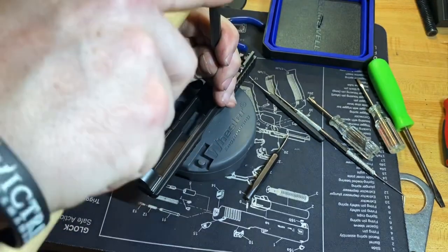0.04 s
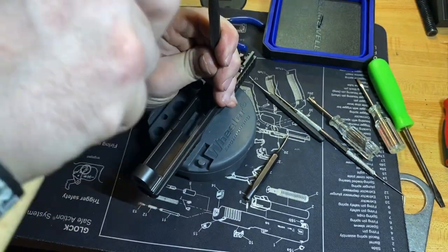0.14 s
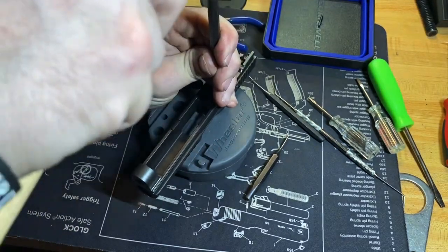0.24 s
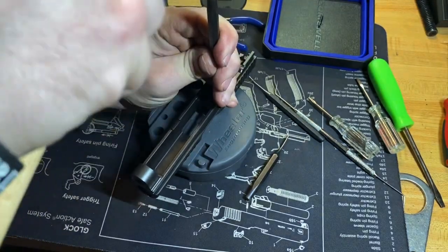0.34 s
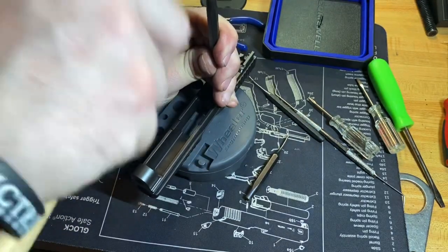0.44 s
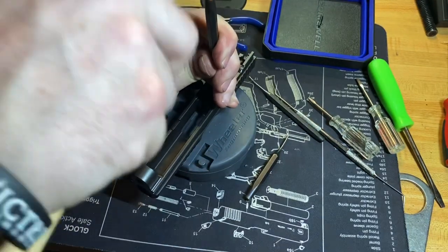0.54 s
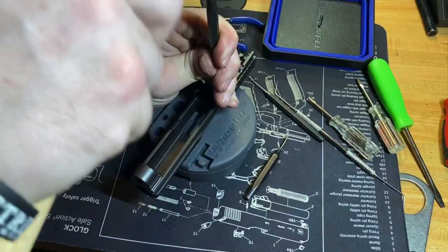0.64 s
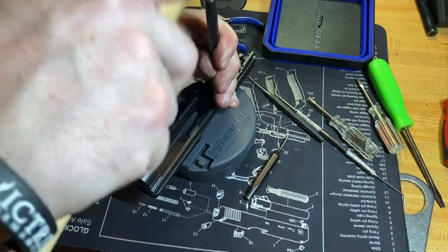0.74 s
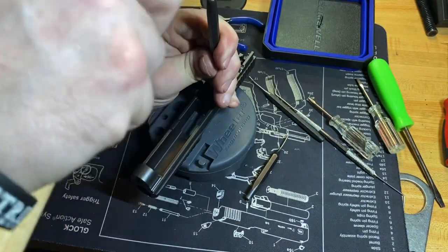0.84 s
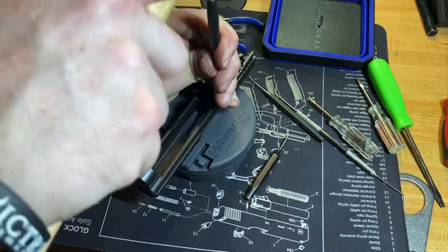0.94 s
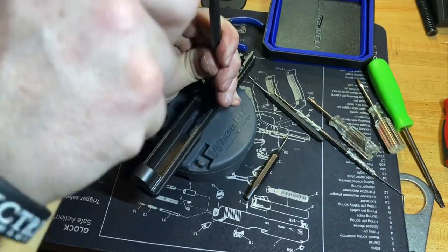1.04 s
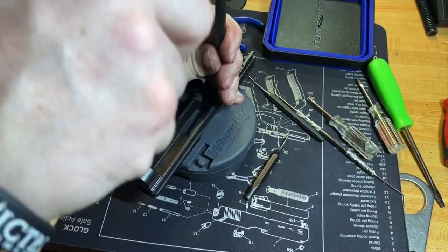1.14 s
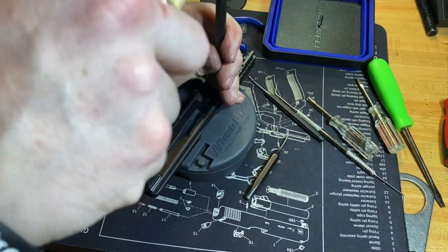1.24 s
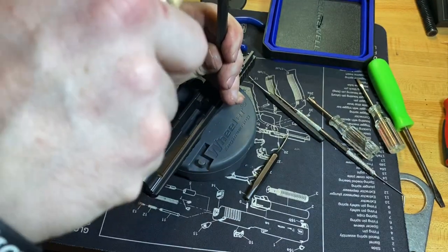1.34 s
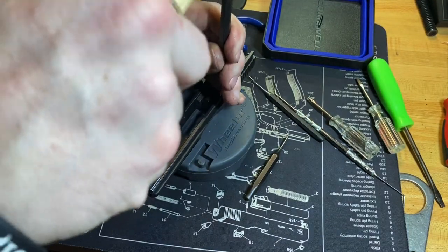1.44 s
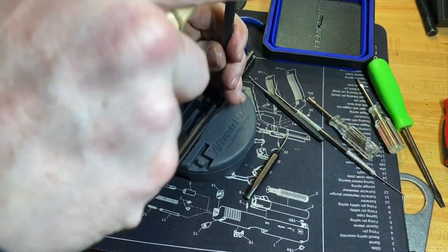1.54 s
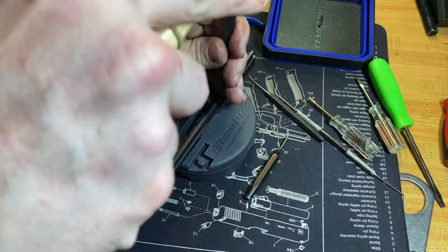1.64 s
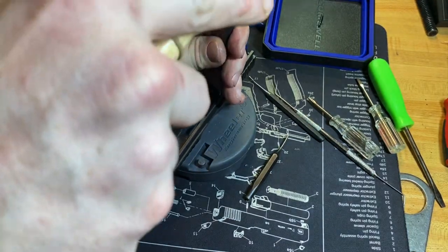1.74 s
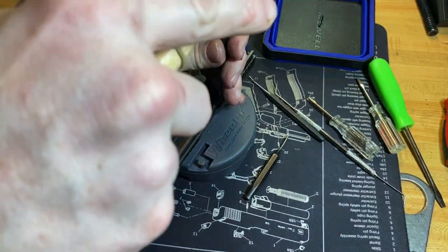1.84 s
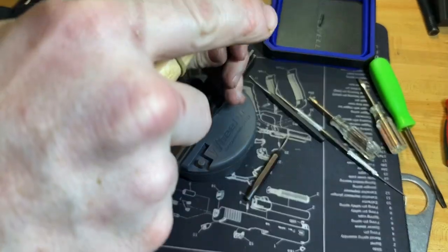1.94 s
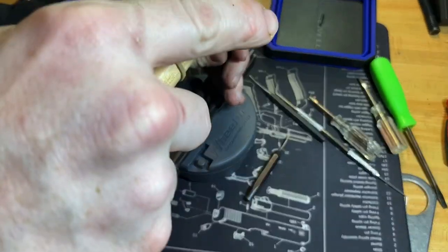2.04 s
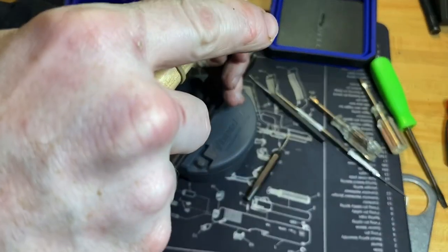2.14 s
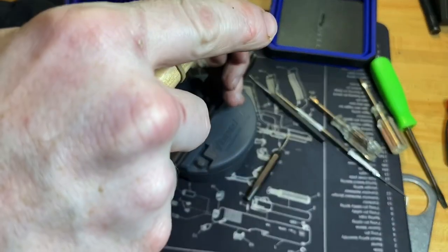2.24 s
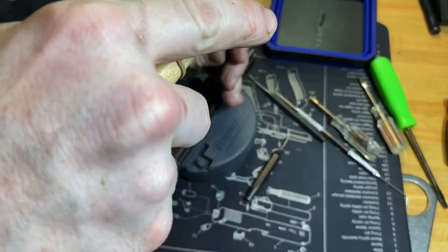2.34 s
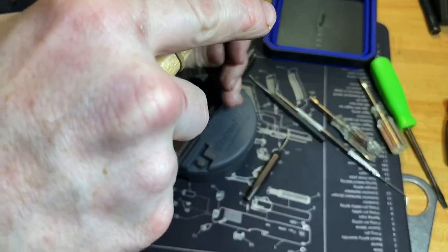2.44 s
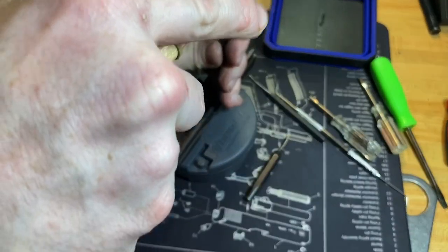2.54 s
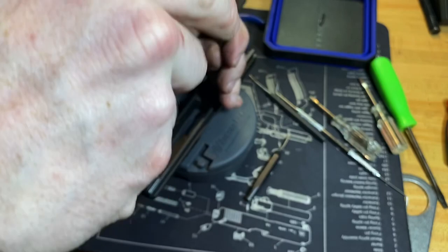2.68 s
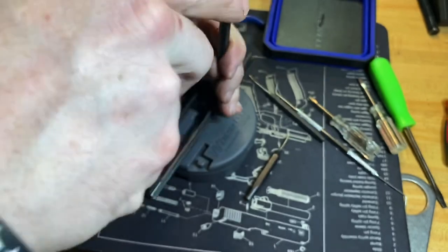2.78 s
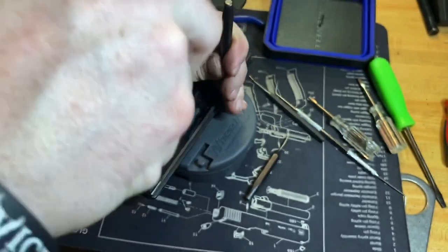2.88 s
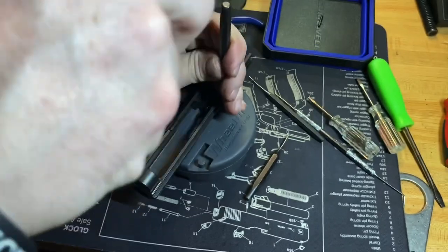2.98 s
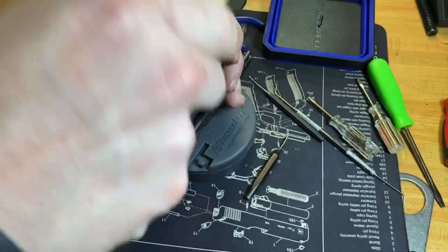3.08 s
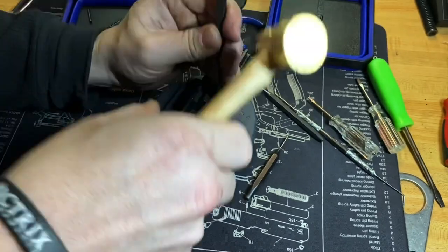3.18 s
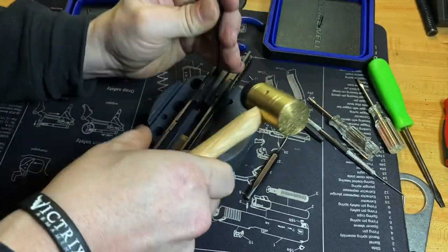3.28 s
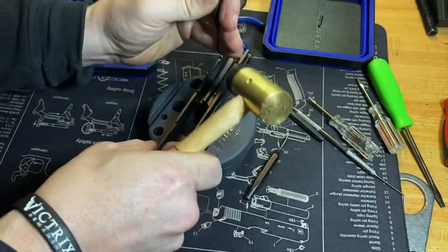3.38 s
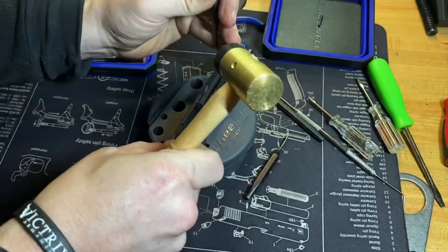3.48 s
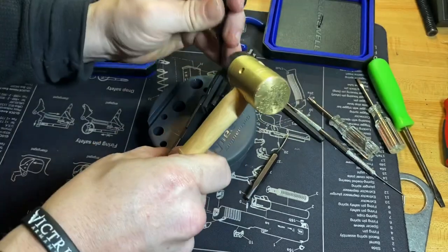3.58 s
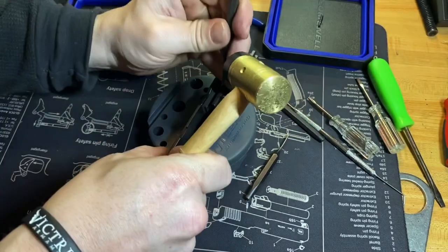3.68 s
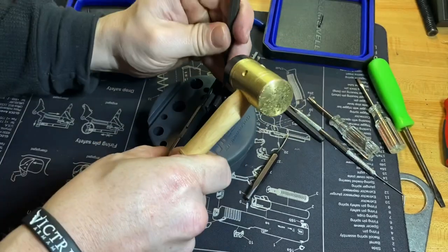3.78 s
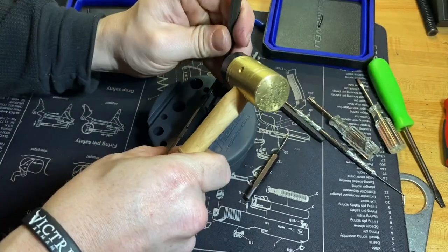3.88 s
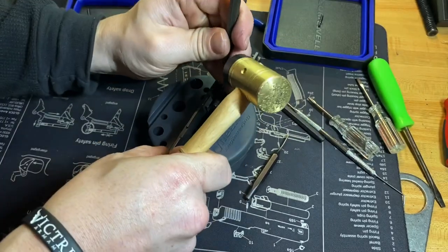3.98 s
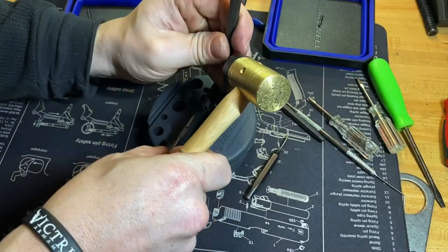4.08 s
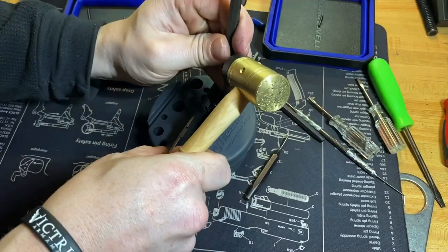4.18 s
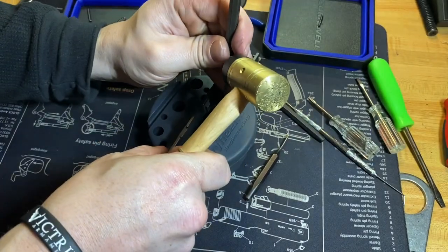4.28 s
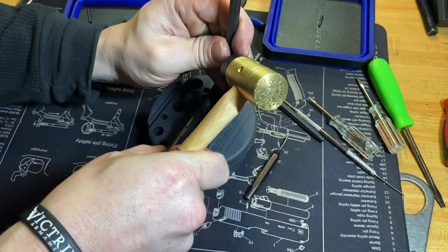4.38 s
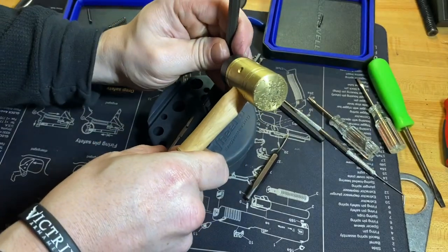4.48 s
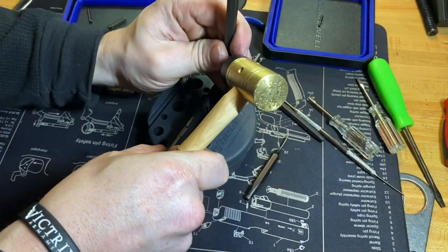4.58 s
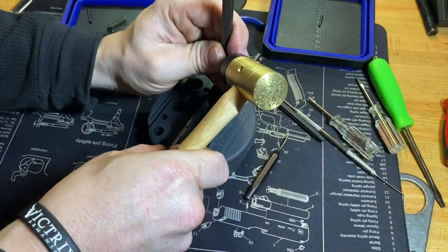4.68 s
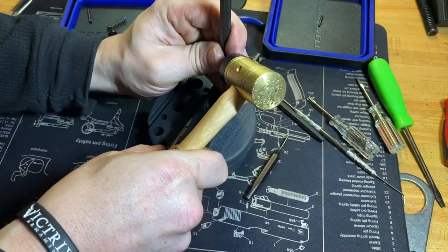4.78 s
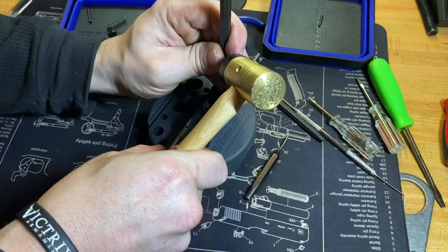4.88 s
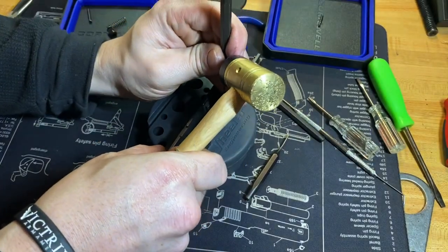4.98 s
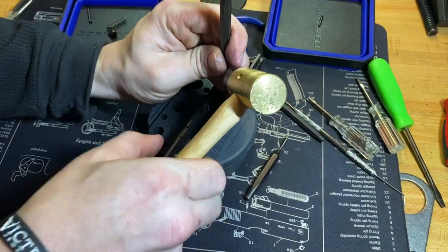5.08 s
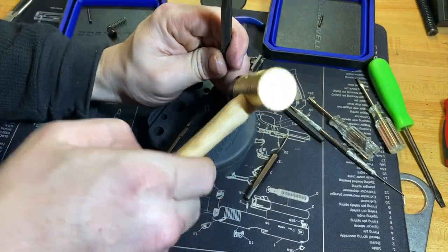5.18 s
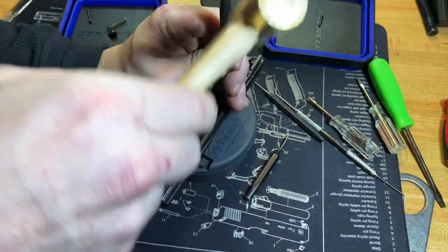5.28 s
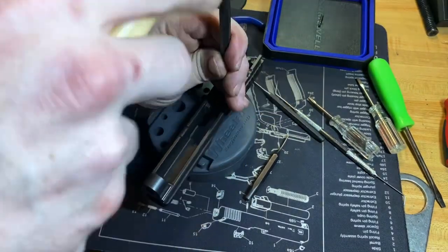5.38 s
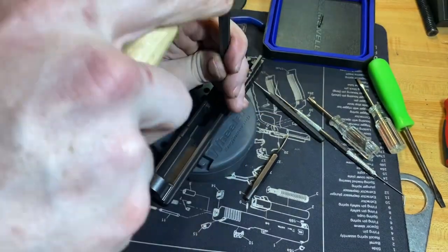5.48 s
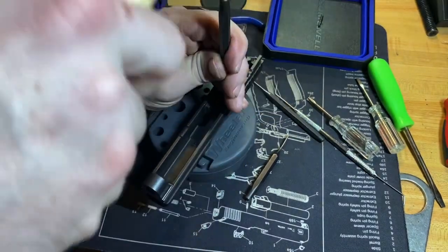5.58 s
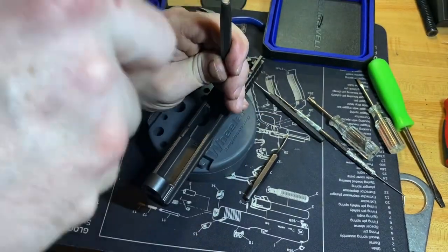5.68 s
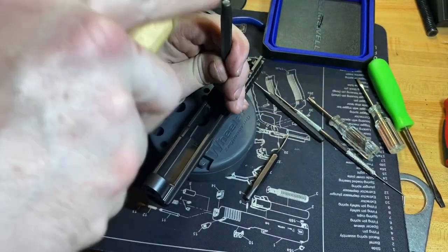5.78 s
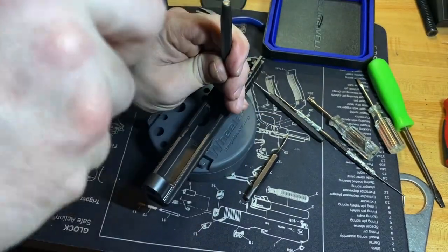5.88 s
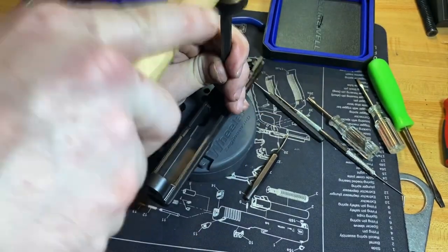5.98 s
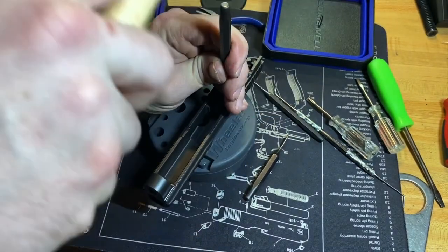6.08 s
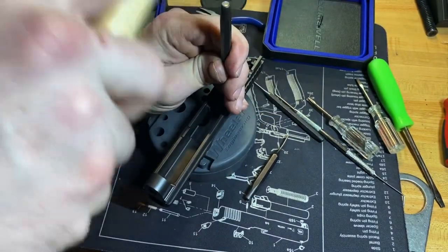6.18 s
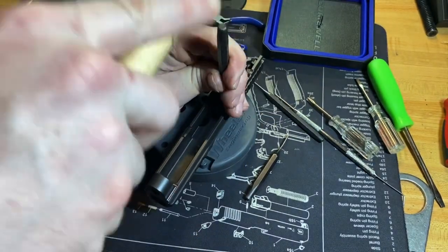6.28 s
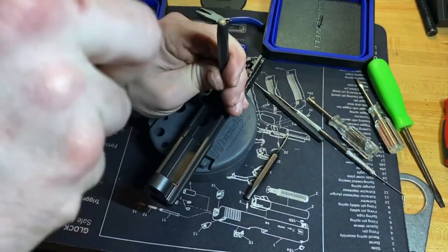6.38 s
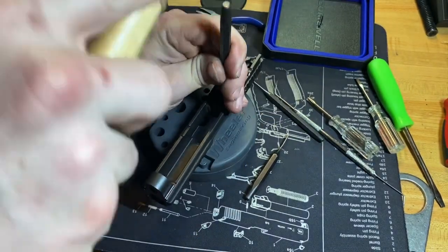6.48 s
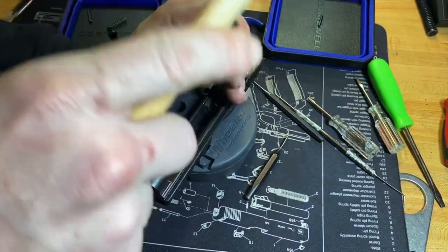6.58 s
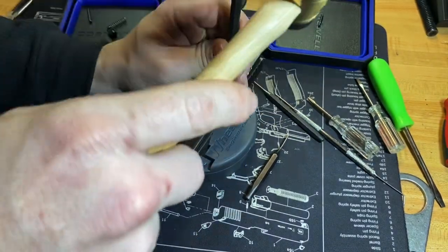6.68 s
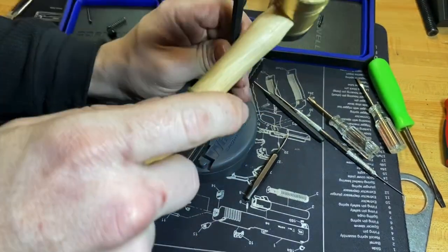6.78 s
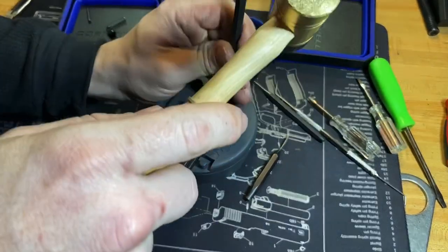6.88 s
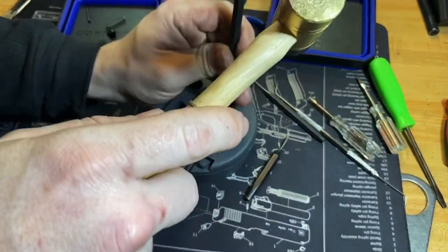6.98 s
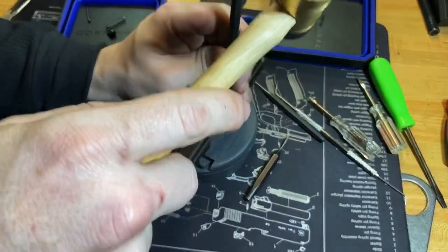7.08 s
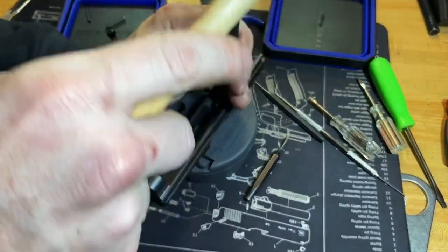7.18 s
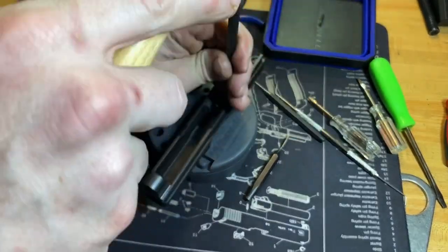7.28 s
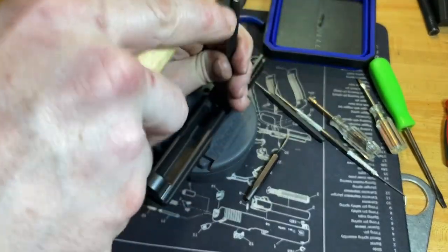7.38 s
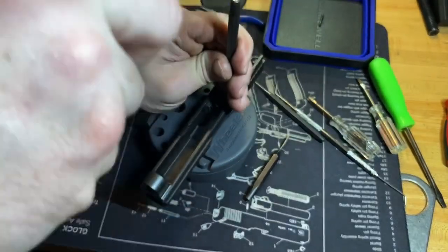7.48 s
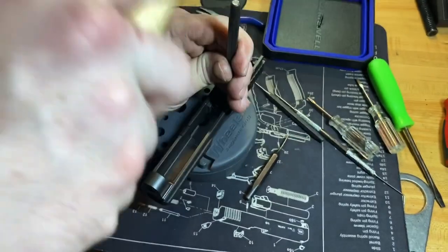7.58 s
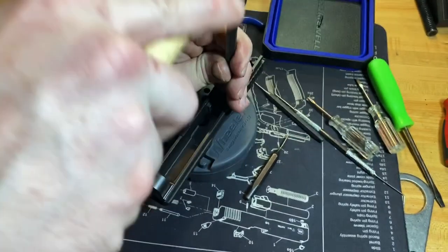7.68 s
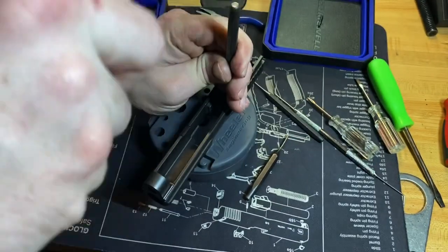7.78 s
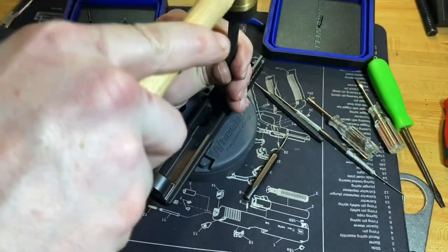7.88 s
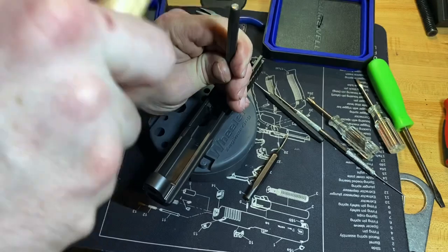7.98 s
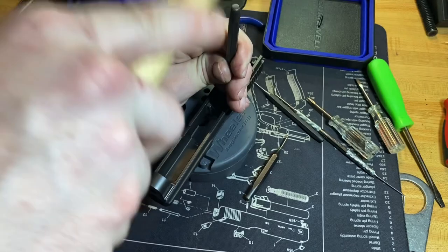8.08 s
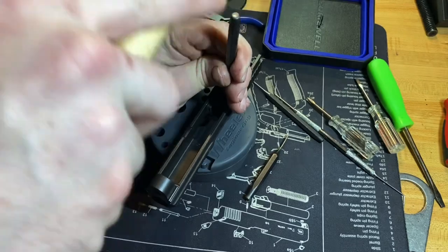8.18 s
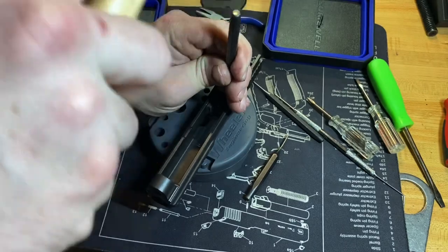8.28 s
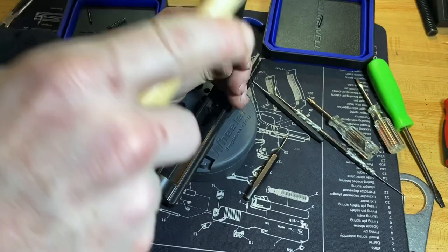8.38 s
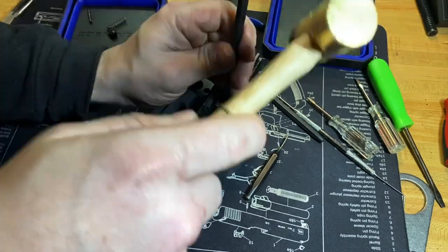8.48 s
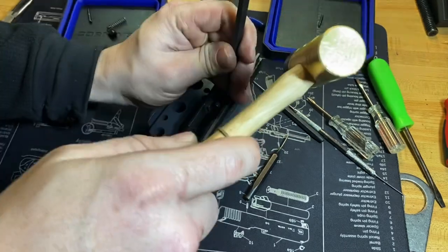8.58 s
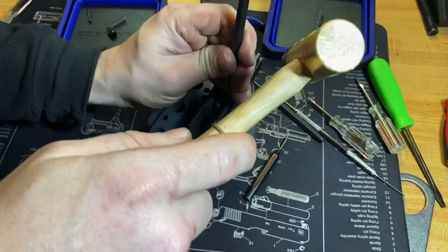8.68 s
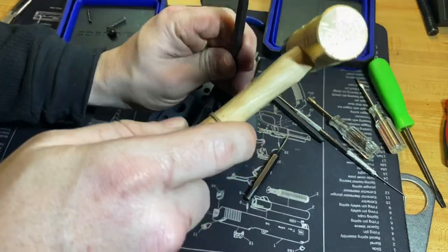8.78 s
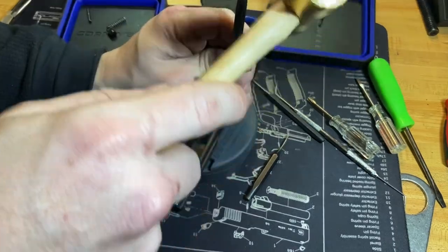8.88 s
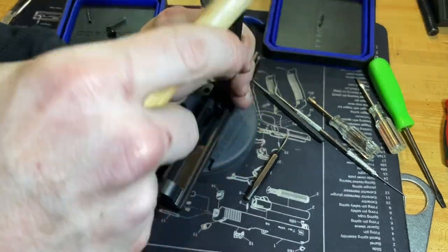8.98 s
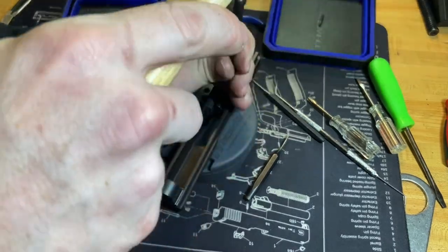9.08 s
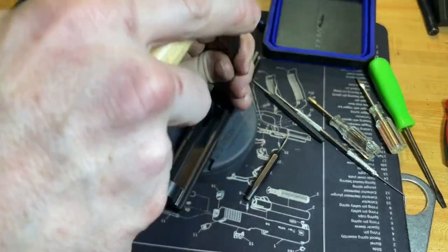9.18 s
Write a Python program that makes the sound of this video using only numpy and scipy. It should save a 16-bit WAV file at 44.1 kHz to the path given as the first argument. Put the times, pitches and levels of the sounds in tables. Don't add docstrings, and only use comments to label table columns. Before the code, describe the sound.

A small hammer strikes a steel punch in sharp ringing taps, grouped in twos and threes, with quiet fumbling between over a low room hum.

```python
import sys
import numpy as np
from scipy import signal
from scipy.fft import rfft, irfft
from scipy.io import wavfile
from scipy.ndimage import uniform_filter1d

SR = 44100
rng = np.random.default_rng(int(sys.argv[2]) if len(sys.argv) > 2 else 0)


def transcribe(u):
    v = np.clip(np.atleast_2d(u).T, -1, 1)
    q = np.round(v * 32767).astype(np.int16)
    wavfile.write(sys.argv[1], SR, q)


def attenuation_scalar(level_db):
    decades = np.asarray(level_db, float) / 20
    return 10 ** decades


N = 407484


def curve(table, hz):
    table_hz, value = np.transpose(table)
    return np.interp(np.log(hz + 1), np.log(table_hz), value)


def colour(x, gain):
    length = x.shape[-1]
    return irfft(rfft(x) * gain(np.fft.rfftfreq(length, 1 / SR)), length)


def shaped_noise(shape, gain):
    return unit(colour(rng.standard_normal(shape), gain))


def bell(hz, width_hz):
    return lambda f: 1 / np.sqrt(1 + ((f - hz ** 2 / (f + 1)) / width_hz) ** 2)


def table_gain(table):
    return lambda f: attenuation_scalar(curve(table, f))


def unit(x):
    return x / np.sqrt(np.mean(x ** 2))


def fade(t, t60):
    return 1000. ** (-t / np.maximum(t60, .002)) * (t >= 0)


def add(out, start_s, x):
    i = int(start_s * SR)
    out[..., i:i + x.shape[-1]] += x[..., :N - i]


def walk(rate_hz):
    hold = int(SR / rate_hz)
    steps = np.repeat(rng.standard_normal(N // hold + 1), hold)
    return 1.7 * uniform_filter1d(uniform_filter1d(steps, hold), hold)[:N]


def ports(x, unlike):
    lag_s = 1.1e-4
    late = colour(x[0], lambda f: np.exp(-2j * np.pi * f * lag_s))
    return np.array([late + unlike * x[1], x[0] - unlike * x[1]])


# freq_hz, level_db [dB per Hz]
HUM = [(13, -64), (22, -39), (42, -8), (65, 2.5), (95, -7), (162, -11.5), (207, -16.5), (297, -13.5),
       (392, -24.5), (628, -23.5), (829, -26.5), (926, -26), (1260, -30), (4490, -42.5), (16500, -83.5)]
# freq_hz, side_minus_mid_db
HUM_SIDE = [(60, -15.5), (110, -12), (200, -11), (380, -2), (700, 2), (1290, 1), (2380, -4), (4400, -1),
            (8120, -1), (15000, -0.5)]
# freq_hz, width_hz, level_db
DRONES = [(59.95, 15, -63.5), (285, 40, -72.5), (620, 40, -77), (920, 40, -77), (1835, 66, -84.5)]


def room_hum():
    level_db = -56 + 1.1 * walk(1.5)
    mid = shaped_noise(N, table_gain(HUM)) * attenuation_scalar(level_db)
    for freq_hz, width_hz, drone_db in DRONES:
        mid += attenuation_scalar(drone_db + 1.2 * walk(4)) * shaped_noise(N, bell(freq_hz, width_hz))
    side = colour(np.roll(mid[::-1], N // 3), table_gain(HUM_SIDE))
    return np.array([mid + side, mid - side])


# time_s, level_db
SLEEVE_STROKES = [
    [(1.3, -92), (1.408, -88.5), (1.418, -65), (1.438, -88), (1.45, -77)],
    [(3.1, -83.5), (3.128, -89), (3.174, -83), (3.224, -86), (3.296, -95), (3.37, -84), (3.42, -92)],
    [(5.02, -100), (5.134, -73), (5.258, -106), (5.304, -79.5), (5.374, -82.5), (5.456, -79), (5.504, -89),
     (5.51, -87), (5.55, -102)],
    [(5.76, -82), (5.818, -88), (5.834, -102), (5.86, -100)],
    [(6.58, -72), (6.586, -79), (6.66, -103)],
    [(8.7, -91), (8.708, -104), (8.75, -95), (8.83, -106), (8.96, -99), (8.994, -88.5), (9.05, -96)],
]


def sleeve():
    t, gain = np.arange(N) / SR, np.zeros(N)
    for stroke in SLEEVE_STROKES:
        time_s, level_db = np.transpose(stroke)
        gain += attenuation_scalar(np.interp(t, time_s, level_db, -140, -140))
    grain = attenuation_scalar(3.3 * walk(60))
    return gain * grain * shaped_noise((2, N), bell(11000, 7000))


# start_s, length_s, slip_rate_hz, level_db, treble_lift_db [dB per octave]
SQUEAKS = [
    (1.409, 0.024, 2245, -57.5, -10),
    (2.34, 0.032, 2915, -70, 0),
]


def squeaks():
    out = np.zeros(N)
    for start_s, length_s, slip_rate_hz, level_db, lift_db in SQUEAKS:
        n = int(length_s * SR)
        waver = 0.066 * uniform_filter1d(rng.standard_normal(4096), size=40)[:n]
        phase = np.cumsum(slip_rate_hz * (1 + waver)) * 2 * np.pi / SR
        stack = np.zeros(n)
        for k in range(1, int(16000 / slip_rate_hz) + 1):
            stack += attenuation_scalar(lift_db * np.log2(k)) * np.sin(k * phase)
        add(out, start_s, attenuation_scalar(level_db) * stack * np.hanning(n))
    return out


# start_s, peak_db, centre_hz, width_hz, t60_s
TICKS = [(2.726, -50, 10450, 9100, .02), (2.836, -43.5, 2010, 500, .04), (2.893, -58.5, 11000, 5000, 0.055),
         (3.262, -68, 13000, 5000, .02), (3.298, -59, 900, 1200, 0.039), (3.330, -57.5, 700, 700, .04),
         (3.375, -67.5, 9500, 3000, 0.015), (5.500, -65, 14000, 5000, .03),
         (5.742, -48.5, 9500, 6990, 0.018), (5.743, -53, 3500, 3000, .02),
         (6.579, -64.5, 9000, 6000, 0.026), (8.648, -78, 8500, 2502, .03), (8.745, -68, 5290, 150, .09),
         (8.9917, -57.5, 2300, 900, .02), (9.0, -67.5, 7000, 8000, 0.027)]


def ticks():
    out, t = np.zeros((2, N)), np.arange(int(.15 * SR)) / SR
    for start_s, peak_db, centre_hz, width_hz, t60_s in TICKS:
        noise = shaped_noise((2, len(t)), bell(centre_hz, width_hz))
        add(out, start_s, ports(attenuation_scalar(peak_db) * noise * fade(t, t60_s), unlike=.5))
    return out


# freq_hz, level_db, t60_s
ROOM_BANDS = [(350, -13.5, 0.23), (700, -17.5, .22), (1400, -19.5, 0.18), (2800, -30.5, 0.18),
              (5300, -38, 0.23), (8500, -35, 0.18), (13000, -27.5, 0.19)]


def room_answer(t):
    mid, side = rng.standard_normal((2, len(t)))
    out = np.zeros((2, len(t)))
    for freq_hz, level_db, t60_s in ROOM_BANDS:
        left = mid + min(freq_hz / 900, 1) * side
        right = mid - min(freq_hz / 830, 1) * side
        band = colour(np.array([left, right]), bell(freq_hz, .7 * freq_hz))
        out += attenuation_scalar(level_db) * fade(t, t60_s) * band
    return out * (1 - fade(t, 0.014)) / 10


# freq_hz, level_db, t60_s, first_swing [sign and share]
BENCH_MODES = [(54, -24.5, .5, -0.74), (81.16, -13, .22, 1), (114, -1.5, 0.091, -1),
               (142.15, -4.5, 0.18, 0.95), (218, -14, .14, 1), (252.4, -24, .24, 0.98),
               (289.5, -22, .1, -0.84), (373, -23.5, .12, 1), (504.4, -27.5, 0.09, -1)]


def bench_thump(t):
    late = t - .0013
    thump = np.zeros(len(t))
    for freq_hz, level_db, t60_s, first_swing in BENCH_MODES:
        thump += first_swing * attenuation_scalar(level_db) * fade(late, t60_s) * np.sin(2 * np.pi * freq_hz * late)
    return attenuation_scalar(8.5) * thump


# freq_hz, share_index [whole part picks the share], level_db, t60_s, left_minus_right_db, left_lead_rad
METAL_MODES = [(5310, 0.5, 4, .13, 10, -3), (5178, 1.5, 7, .13, 7.5, -1.44), (3890, 3, 3, 0.15, 8, 6.5),
               (2800, 4, -5.5, 0.076, 7, -1), (7870, 3, 2.5, 0.064, -5.5, -1.3),
               (10350, 4, -4, 0.093, 3.5, 1.27), (12110, 4, 0.5, 0.073, -0.5, -0.86),
               (15300, 4, -4, .05, 4.5, 2.2)]


def metal_ring(t, main_hz, share_db):
    shift = np.clip(main_hz / METAL_MODES[0][0], .99, 1.01)
    side = np.array([[.5], [-.5]])
    out = np.zeros((2, len(t)))
    for freq_hz, share_index, level_db, t60_s, pan_db, lead_rad in METAL_MODES:
        phase = rng.uniform(0, 2 * np.pi) + lead_rad * side
        swell = 1 - fade(t, 0.0025)
        ring = np.sin(2 * np.pi * freq_hz * shift * t + phase) * fade(t, t60_s) * swell
        out += attenuation_scalar(share_db[int(share_index)] + level_db + pan_db * side) * ring
    return out


# freq_hz, level_db
CRACK = [(180, -42), (300, -10), (1190, -14.5), (3900, -5.5), (4460, -9.5), (5280, 5), (5830, -25),
         (7890, -23.5), (8440, -29), (12200, -25), (13300, -41.5), (15400, -20), (16500, -31)]


def crack(t, level_db):
    noise = shaped_noise((2, len(t)), table_gain(CRACK))
    envelope = fade(t, .012) + attenuation_scalar(-9.5) * fade(t, 0.062)
    return ports(attenuation_scalar(level_db + 3.5) * noise * envelope, unlike=0.49)


# start_s, crack_db, thump_db, main_ring_hz, room_wash_db
BLOWS = [(0.016, -15, -27.5, 5320, -3.5), (0.479, -14, -23, 5310, -1.5), (0.706, -15, -24.5, 5310, -4),
         (1.459, -39.5, -56, 5290, 0.5), (2.087, -66, -60, 5260, 0), (2.794, -21, -44, 5310, -3),
         (3.504, -44, -49, 5270, -3.5), (4.591, -50.5, -63, 5230, -1), (5.993, -14, -23, 5310, -2),
         (6.228, -13, -19.5, 5275, -2), (7.625, -13.5, -21, 5310, 0), (7.864, -16, -20.5, 5300, 0.5),
         (8.104, -10, -20, 5260, -2.5)]
# start_s [not read], main_db [5310 Hz], twin_db [5178 Hz], low_db
# [not read], high_db [3890 and 7870 Hz], top_db [2800 Hz and all above 10 kHz]
RING_SHARES = [(0.0159, -22.5, -18.5, -30, -38, -43.5), (0.4803, -25, -26, -27, -32.5, -40.5),
               (0.7059, -21, -20.5, -28, -27.5, -42.5), (1.4591, -37.5, -63.5, -54, -57, -54),
               (2.0864, -81, -83, -73.5, -93, -93), (2.7921, -19.5, -22, -42, -31, -29.5),
               (3.5039, -79, -72, -71, -89, -93), (4.594, -68, -70, -60, -93, -80),
               (5.9928, -21.5, -20.5, -35, -37.5, -32), (6.2277, -18.5, -24.5, -31, -37.5, -37.5),
               (7.6246, -20.5, -21.5, -33, -41.5, -33), (7.8645, -21.5, -24.5, -22, -36.5, -35),
               (8.1045, -25.5, -25, -34, -29.5, -32)]


def hammer():
    out, t = np.zeros((2, N)), np.arange(int(.6 * SR)) / SR
    walls = room_answer(t)
    thump = bench_thump(t)
    for blow, (_, *share_db) in zip(BLOWS, RING_SHARES):
        start_s, crack_db, thump_db, main_hz, wash_db = blow
        close = crack(t, crack_db) + metal_ring(t, main_hz, share_db)
        wash = signal.fftconvolve(walls, close[:1], axes=1)[:, :len(t)]
        add(out, start_s, close + attenuation_scalar(wash_db) * wash + attenuation_scalar(thump_db) * thump)
    return out


def scene():
    return room_hum() + sleeve() + squeaks() + ticks() + hammer()


def low_pass(x):
    return signal.sosfilt(signal.butter(12, 16990, fs=SR, output="sos"), x)


def record(dry):
    mix = np.tanh(1.3 * dry) / 1.31
    return low_pass(mix)


dry = scene()
out = record(dry)
transcribe(out)
```